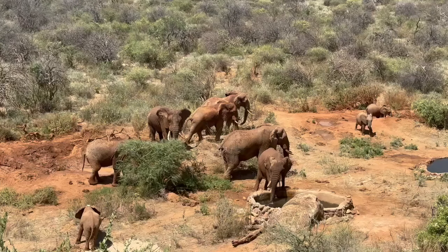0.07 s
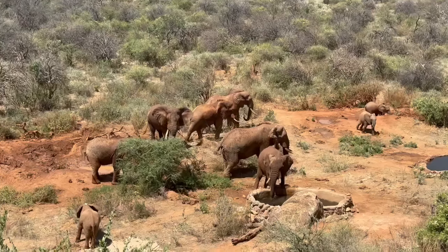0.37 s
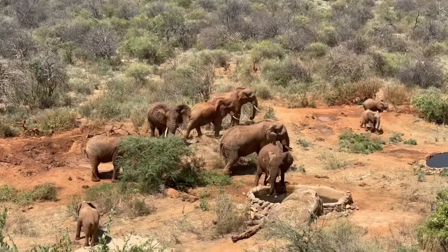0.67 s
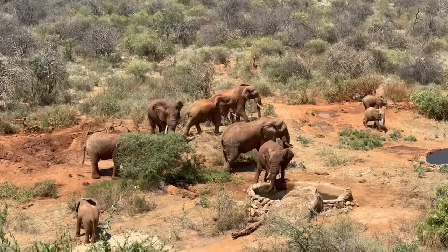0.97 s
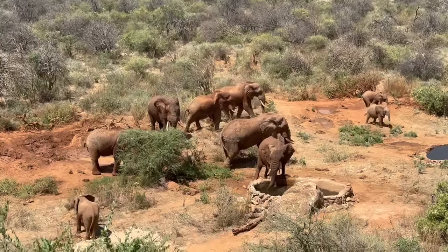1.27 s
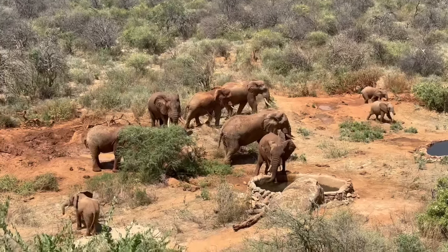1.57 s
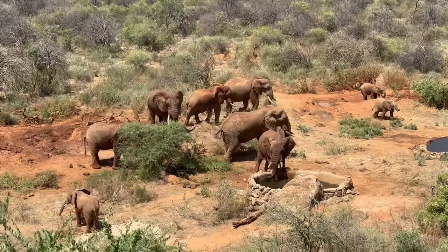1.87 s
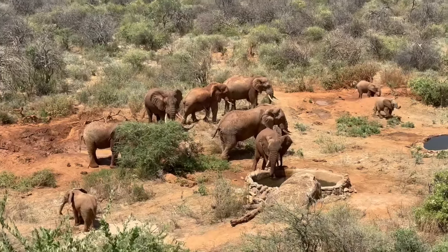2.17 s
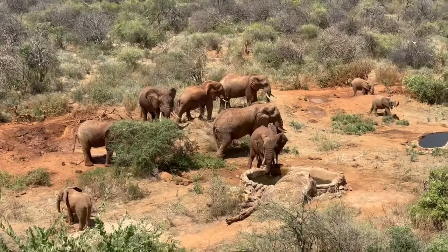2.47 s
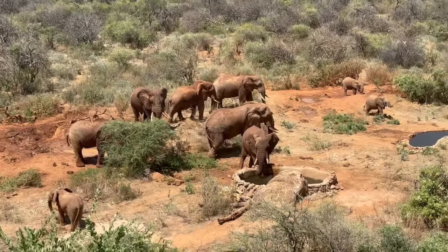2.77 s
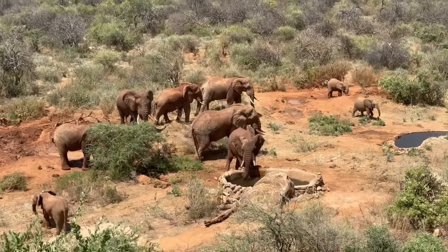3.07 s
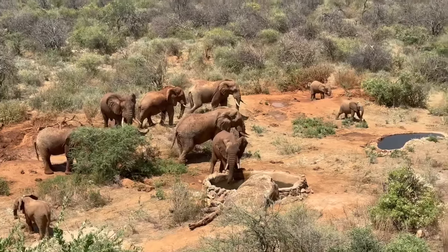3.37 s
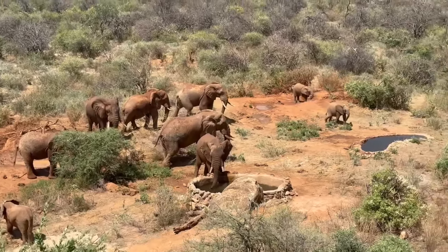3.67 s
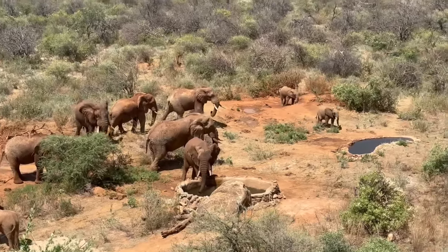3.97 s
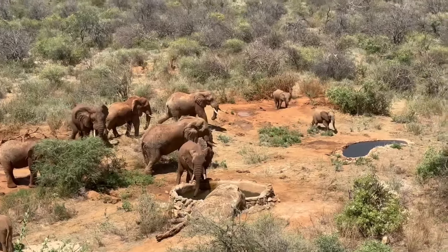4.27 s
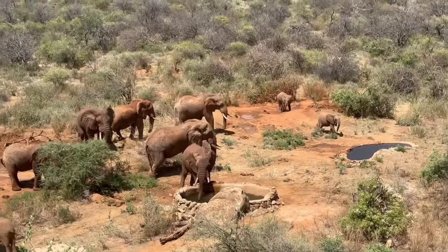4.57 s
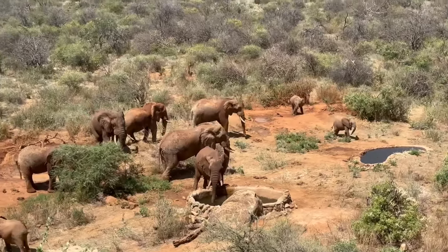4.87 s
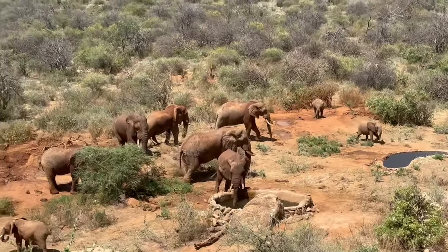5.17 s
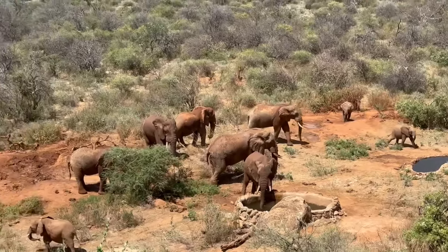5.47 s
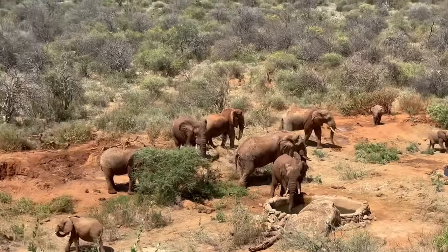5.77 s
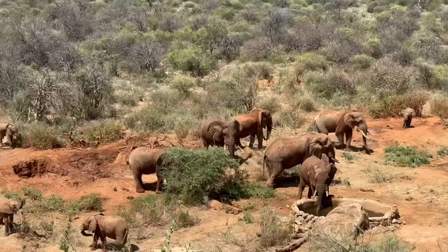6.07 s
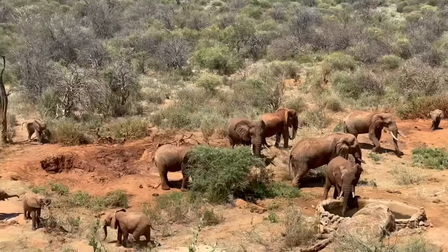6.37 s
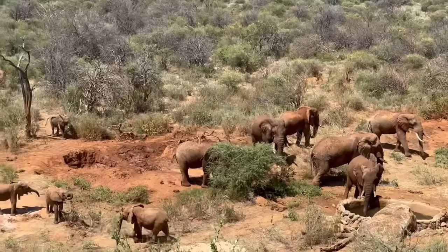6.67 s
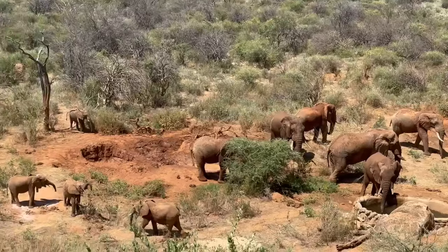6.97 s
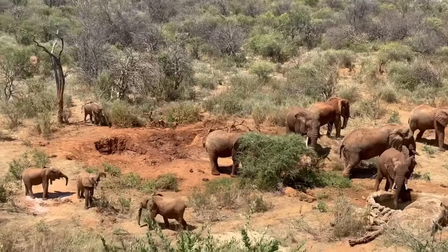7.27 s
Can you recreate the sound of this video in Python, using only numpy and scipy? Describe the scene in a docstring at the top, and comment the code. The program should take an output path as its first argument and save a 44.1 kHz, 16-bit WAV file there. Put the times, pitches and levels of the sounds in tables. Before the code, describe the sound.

The sound starts abruptly with something like a chair being dragged over a sandy deck, close and slightly left. It makes a loud, harsh, ringing roar with grit and short squeals, stalls at about 0.75 seconds and settles with two soft scuffs. From 1 second on, a quiet breeze hisses in dry bushes and rumbles lightly on the microphone, over a very faint, steady high whine. Everything cuts out for an instant just after 2 seconds. Near 3 seconds comes a quick cluster of dull thumps, each dropping in pitch with a short low ring, the last much louder. Tiny dry twig snaps are scattered throughout the breeze, clearest at about 2.3, 3.3 and 4.3 seconds. The breeze swells slightly around 4 seconds, then eases. Faint thumps fall near 5, 5.3, 6.5 and 7 seconds, followed by one small woody snap just before the end.

```python
"""A lookout above a waterhole in dry scrub. Close by, something like a chair is dragged over the deck:
its feet stick and slip on sand, and its frame rings with a harsh roar and short squeals. Then a light
breeze hisses in the bushes and rumbles on the microphone, with a faint high whine, tiny snaps of
dry twigs and a few dull thumps that fall quickly in pitch, each with a short low ring."""
import sys
import numpy as np
from scipy import signal
from scipy.fft import rfft, irfft
from scipy.io import wavfile
from scipy.ndimage import uniform_filter1d, minimum_filter1d

SR = 44100
rng = np.random.default_rng(int(sys.argv[2]) if len(sys.argv) > 2 else 0)


def wav_record(signal):
    """Record a signal, one row per channel, as 16-bit PCM in the file named by sys.argv[1]."""
    frames = np.transpose(np.atleast_2d(signal))
    bounded = np.clip(frames, -1, 1)
    # unit amplitude maps onto the largest positive 16-bit level
    quanta = np.round(bounded * 32767).astype(np.int16)
    wavfile.write(sys.argv[1], SR, quanta)


N = 323253
TIME, FREQ = np.arange(N) / SR, np.fft.rfftfreq(N, 1 / SR)
STOP_S = 0.7504  # the drag stalls
CALM_DB = -63  # reference breeze strength

# stick-slip rate of the slowest foot: time_s, slips_per_s
SLIP_RATE = [(0.05, 72), (0.18, 72.6), (0.25, 91), (0.40, 106), (0.55, 126), (0.66, 120), (0.76, 90.4),
             (0.90, 115)]
# chair frame resonances: pitch_hz, width_hz, gain_db
FRAME_MODES = [(271.9, 16.2, -3.5), (351, 19.5, -0.5), (399.4, 15.4, -2.5), (468, 29, -7.5), (531, 18, -3),
               (563.6, 18, -0.5), (659, 28, 0), (716, 31, 0.5), (766, 64, -3), (867, 14, -3),
               (951, 19.5, -0.5), (997, 15, -0.5), (1058, 26, -3), (1108, 12, -11), (1160, 28, -4.5),
               (1235, 15, -2.5), (1278, 14, 0), (1320, 28, -3.5), (1400, 20, -1), (1450, 78, -15),
               (1557, 79, -11), (1640, 17, -11.5), (1900, 85, -18), (2031, 29, -10), (2114, 23, -17),
               (2374, 240, -18.5), (2600, 60, -20.5), (2770, 31, -16.5), (2830, 210, -26.5)]
# breeze: time_s, strength_db
BREEZE_STRENGTH = [(1.2, -62.5), (2.5, -61), (3.0, -59.5), (3.3, -60.5), (4.1, -58), (4.8, -59), (5.5, -61),
                   (7.3, -64)]
# dry leaf spectrum: freq_hz, gain_db
LEAF_SPECTRUM = [(1500, -28), (3500, -4), (5300, -1.5), (6500, 1.5), (8000, 1), (9500, -1), (11000, -7.5),
                 (13000, -11.5), (15500, -16)]


def gain_of(db):
    """Decibels to amplitude."""
    return 10 ** (np.asarray(db) / 20)


def unit_rms(x):
    """Scales to rms 1."""
    return x / np.sqrt(np.mean(x ** 2) + 1e-20)


def at_hz(table, hz):
    """Interpolates a table over log frequency."""
    freq_hz, value = np.transpose(table)
    return np.interp(np.log(hz + 1), np.log(freq_hz + 1), value)


def at_time(table, t):
    """Interpolates a table over time."""
    return np.interp(t, *np.transpose(table))


def add(mix, start_s, sound):
    """Mixes a sound in at start_s."""
    part = mix[max(round(start_s * SR), 0):][:len(sound)]
    part += sound[:len(part)]


def drift(size, cutoff_hz):
    """Smooth random motion, rms 1."""
    hz = np.fft.rfftfreq(size, 1 / SR)
    return unit_rms(irfft(rfft(rng.standard_normal(size)) / (1 + (hz / cutoff_hz) ** 4), size))


def swell(peak_s, width_s):
    """Gaussian envelope of height 1."""
    return np.exp(-.5 * ((TIME - peak_s) / width_s) ** 2)


def ring(x, response, size=8192):
    """Minimum-phase body with gain response(hz)."""
    log_gain = np.log(response(abs(np.fft.fftfreq(size, 1 / SR))) + 1e-5)
    impulse = np.fft.ifft(np.exp(np.conj(signal.hilbert(log_gain)))).real
    return signal.fftconvolve(x, impulse[:size // 2])[:len(x)]


def steadied(x, size=1500):
    """Holds the running rms near 1."""
    power = uniform_filter1d(uniform_filter1d(x ** 2, size), size)
    return x / np.sqrt(abs(power) + 1e-3 * np.mean(x ** 2))


def phase_split(x, lead_table):
    """Advances left against right by a frequency-dependent phase."""
    return irfft(rfft(x) * np.exp(.5j * at_hz(lead_table, FREQ) * np.array([[1], [-1]])), N)


def stick_slip(t, jitter=.09, spread_db=2.0, sand=0.29, foot_ratio=1.31, feet=3):
    """Each foot sticks and lets go at its own uneven rate; sand crunches in between."""
    rate_hz = at_time(SLIP_RATE, t)
    kicks = np.zeros(len(t))
    for foot in range(feet):
        foot_hz = rate_hz * foot_ratio ** foot * np.exp(jitter * drift(len(t), 70))
        cycles = np.cumsum(foot_hz) / SR + rng.random()
        released = np.diff(np.floor(cycles), prepend=0) > 0
        kicks += released * gain_of(spread_db * rng.standard_normal(len(t)))
    return unit_rms(kicks - kicks.mean()) + sand * rng.standard_normal(len(t))


def stall_db(t, tau_s):
    """Level drop as the feet stall: -10 dB at STOP_S, then down to a floor."""
    return -10 * np.exp(np.minimum((t - STOP_S) / tau_s, 2))


def frame(drive, rolloff):
    """Frame modes, summed in power, ring at a steady level; cut where rolloff(hz) exceeds 1."""
    def response(hz):
        modes = (gain_of(db) / (1 + ((hz - pitch_hz) / width_hz) ** 2)
                 for pitch_hz, width_hz, db in FRAME_MODES)
        return np.sqrt(sum(mode ** 2 for mode in modes)) / np.hypot(1, rolloff(hz))
    return steadied(ring(drive, response))


def singing(t, share_db=-14, sharp_hz=25, swing_db=5, swing_hz=5, waver=0.0047):
    """The sharpest frame modes take turns to sing faintly above the roar."""
    out = np.zeros(len(t))
    for pitch_hz, width_hz, db in FRAME_MODES:
        cycles = np.cumsum(pitch_hz * (1 + waver * drift(len(t), 50))) / SR
        grip = gain_of(db + swing_db * np.minimum(drift(len(t), swing_hz), 1))
        out += grip / np.hypot(1, (width_hz / sharp_hz) ** 2) * np.sin(2 * np.pi * cycles)
    return gain_of(share_db) * unit_rms(out)


def screeches(t, speed, rise=0.05, waver=0.0091, flutter_db=4.5, flutter_hz=14):
    """Sand screeches under a foot, higher as it slips faster."""
    # tones at the slowest slip: pitch_hz, level_db
    tones = [(2000, -41.5), (2390, -42), (2740, -42), (3400, -48), (4680, -48)]
    out = np.zeros(len(t))
    for pitch_hz, db in tones:
        cycles = np.cumsum(pitch_hz * (1 + rise * speed + waver * drift(len(t), 120))) / SR
        level = gain_of(db + flutter_db * np.minimum(drift(len(t), flutter_hz), 1))
        out += level * np.sin(2 * np.pi * cycles)
    return out


def grit(rattle, speed, level_db=-37.8, speed_db=3.5, low_cut_hz=2500):
    """Sand crunches under the feet, louder and duller with speed."""
    # crunch spectra at slow and fast slip: freq_hz, gain_db
    slow_spectrum = [(2500, -6), (2850, 8), (3300, -2), (4000, 2), (4700, 1.5), (5400, 2.5), (6000, -5),
                     (7400, -8), (8400, -10), (9300, -16.5), (11000, -21), (13000, -31), (15500, -38)]
    fast_spectrum = [(2500, -6), (3200, -1), (3700, 1.5), (4400, 0), (4950, -0.5), (5500, -9), (6000, -14),
                     (7400, -12.5), (8400, -17), (9300, -19.5), (11000, -36), (13000, -47), (15500, -63)]

    def crunch(spectrum):
        return steadied(ring(
            rattle, lambda hz: gain_of(at_hz(spectrum, hz)) * np.minimum(hz / low_cut_hz, 1) ** 4))
    blend = (1 - speed) * crunch(slow_spectrum) + speed * crunch(fast_spectrum)
    return steadied(blend) * gain_of(level_db + speed_db * speed)


def scuffs(t, kicks, rise_db_per_s=1000, fall_db_per_s=420, cutoff_hz=700):
    """The feet settle with soft scuffs on the low frame modes."""
    # scuffs: peak_s, level_db
    peaks = [(0.76, -29.5), (0.837, -30)]
    level = sum(gain_of(db - np.maximum((peak_s - t) * rise_db_per_s, (t - peak_s) * fall_db_per_s))
                for peak_s, db in peaks)
    return level * frame(kicks, lambda hz: (hz / cutoff_hz) ** 8)


def chair(start_s=0.054, roar_db=-18, rasp_db=-31.5, split_hz=1750, sand_s=0.0023,
          bite_db=-3.5, bite_s=0.056, ease_db_per_s=-4, treble_stall=2.1):
    """Slips shake the frame: low modes roar, high modes rasp. The drag bites, eases and stalls."""
    t = TIME[:SR]
    speed = np.interp(at_time(SLIP_RATE, t), [75, 115], [0, 1])
    kicks = stick_slip(t)
    # each slip grinds sand for a moment
    grinding = np.sqrt(signal.lfilter([1], [1, -np.exp(-1 / (sand_s * SR))], kicks ** 2))
    rattle = 0.37 * kicks + unit_rms(grinding) * rng.standard_normal(len(t))
    age_s = np.maximum(t - start_s, 0)
    force_db = roar_db + bite_db * np.exp(-age_s / bite_s) + ease_db_per_s * age_s
    drop_db = stall_db(t, tau_s=0.023)
    roar = frame(kicks, lambda hz: (hz / split_hz) ** 12) + singing(t)
    rasp = gain_of(rasp_db) * frame(rattle, lambda hz: (split_hz / (hz + 1)) ** 12)
    drag = roar * gain_of(force_db + drop_db)
    drag += (rasp + screeches(t, speed)) * gain_of(treble_stall * drop_db)
    drag += grit(rattle, speed) * gain_of(treble_stall * stall_db(t, tau_s=0.032))
    return np.pad(drag + scuffs(t, kicks), (0, N - len(t)))


def squeals(trim_db=-5.5, waver=0.0058, flutter_db=0.5, sag_per_s=1.4):
    """A foot locks on to one resonance and sings; the pitch sags once the chair stops."""
    # squeals: start_s, length_s, pitch_hz, relative_db
    notes = [(0.072, 0.23, 355.5, -23.5), (0.096, 0.055, 691, -22), (0.239, 0.267, 1264, -21.5),
             (0.339, 0.154, 1407, -22.5), (0.49, 0.089, 663, -24), (0.618, 0.099, 380.4, -26.5),
             (0.645, 0.1, 948, -22), (0.746, 0.06, 346, -21)]
    out = np.zeros(N)
    for start_s, length_s, pitch_hz, db in notes:
        n = round(length_s * SR)
        sag = sag_per_s * np.maximum(start_s + TIME[:n] - STOP_S, 0)
        hz = pitch_hz * (1 - sag + sag.mean() + waver * drift(n, 50))
        level = gain_of(db + trim_db + flutter_db * drift(n, 40)) * signal.windows.tukey(n, 0.56)
        add(out, start_s, np.sqrt(2) * level * np.sin(2 * np.pi * np.cumsum(hz) / SR))
    return out


def reflections(x, t60_s):
    """Dense, short echo tail of unit energy."""
    t = TIME[:SR // 3]
    echoes = rng.standard_normal(len(t)) * gain_of(-60 * t / t60_s)
    return signal.fftconvolve(x, echoes / np.linalg.norm(echoes))[:len(x)]


def deck(x, low_cut_hz=205, tail_hz=1800, tail_db=-15, side_db=-21):
    """The frame radiates no deep bass and sits slightly left; treble lingers, board echoes widen it."""
    # stereo lean: freq_hz, left_minus_right_db
    lean = [(100, 1), (380, .7), (700, 1.8), (1300, 1.8), (2400, 0)]
    x = signal.sosfilt(signal.butter(6, low_cut_hz, "high", fs=SR, output="sos"), x)
    treble = signal.sosfilt(signal.butter(2, tail_hz, "high", fs=SR, output="sos"), x)
    x = x + gain_of(tail_db) * reflections(treble, t60_s=0.7)
    side = gain_of(side_db) * reflections(x, t60_s=0.067)
    sign = np.array([[1], [-1]])
    return irfft(rfft(x) * gain_of(sign * at_hz(lean, FREQ) / 2), N) + sign * side


def wash(spectrum, patchy_db, flicker_db, side_db, size=512):
    """Coloured stereo noise with drifting patches and a flicker common to all bands."""
    hop = size // 4
    steps, bins = N // hop + 5, size // 2 + 1
    patches = uniform_filter1d(rng.standard_normal((steps, bins)), size=9, axis=0)
    patches = unit_rms(uniform_filter1d(patches, size=7, axis=1))
    flicker = unit_rms(uniform_filter1d(rng.standard_normal(steps), size=4))
    cells = rng.standard_normal((2, bins, steps)) + 1j * rng.standard_normal((2, bins, steps))
    cells *= gain_of(patchy_db * patches.T + flicker_db * flicker)
    white = signal.istft(cells, nperseg=size, noverlap=size - hop)[1][:, :N]
    mid, side = irfft(rfft(white) * gain_of(at_hz(spectrum, FREQ)), N)
    return unit_rms(mid) + gain_of(side_db) * unit_rms(side) * np.array([[1], [-1]])


def eddies(share_db=-9.5, rate_per_s=30, spread_db=4.5, t60_s=0.039, band_hz=(320, 590)):
    """Small eddies pat the microphone at random."""
    starts = (rng.random(N) < rate_per_s / SR) * gain_of(spread_db * np.minimum(rng.exponential(1, N), 2))
    pats = signal.fftconvolve(starts, gain_of(-60 * TIME[:SR // 10] / t60_s))[:N]
    band = signal.butter(2, band_hz, "band", fs=SR, output="sos")
    return gain_of(share_db) * unit_rms(signal.sosfilt(band, pats * rng.standard_normal(N)))


def air(level_db=-50.5, follow=0.31):
    """Air in the scrub follows the breeze and reaches the right microphone port first."""
    # air spectrum: freq_hz, gain_db
    spectrum = [(20, -32), (45, -15), (90, -2.5), (200, -0.5), (500, -0.5), (850, -0.5), (1100, -3),
                (1400, -3.5), (2000, -9.5), (3150, -11.5), (3500, -15.5), (6000, -26), (15000, -39)]
    # arrival phase: freq_hz, left_lead_rad
    arrival = [(50, 0.18), (250, -0.63), (500, -1.09), (1100, -1.75), (1500, -1), (2100, -0.033)]
    flow = wash(spectrum, patchy_db=2, flicker_db=0.78, side_db=-14.5) + eddies()
    level = gain_of(level_db + follow * (at_time(BREEZE_STRENGTH, TIME) - CALM_DB))
    return phase_split(flow * level, arrival)


def leaves(above_breeze_db=1.5, rustle_s=0.036):
    """Dry leaves hiss with the breeze; a nearby bush rustles."""
    # rustles: peak_s, level_db
    rustles = [(2.13, -61), (4.04, -59), (5.0, -57)]
    rustle = sum(gain_of(db) * swell(peak_s, rustle_s) for peak_s, db in rustles)
    hiss = gain_of(at_time(BREEZE_STRENGTH, TIME) + above_breeze_db)
    return wash(LEAF_SPECTRUM, patchy_db=1.5, flicker_db=1.5, side_db=-48) * np.hypot(hiss, rustle)


def wind_rumble(lull_db=-67.5, lumps_db=1.0, lumps_hz=7):
    """Gusts strike the microphone over a faint, uneven rumble."""
    # gusts: peak_s, width_s, level_db
    gusts = [(0.08, 0.033, -48), (0.26, 0.26, -53.5), (0.65, 0.018, -46), (0.85, 0.029, -51.5),
             (1.11, 0.025, -56), (1.6, 0.09, -60), (2.88, 0.18, -58.5), (3.01, 0.029, -50)]
    # rumble spectrum: freq_hz, gain_db
    spectrum = [(15, -32), (35, -4), (55, 2), (90, -3), (150, -14), (400, -42), (3000, -75)]
    gusting = sum(gain_of(db) * swell(peak_s, width_s) for peak_s, width_s, db in gusts)
    lull = gain_of(lull_db + lumps_db * drift(N, lumps_hz))
    return wash(spectrum, patchy_db=2, flicker_db=2.5, side_db=-14) * np.hypot(lull, gusting)


def whine(top_hz=3138.5, step_hz=91.8, top_db=-72, step_db=-1.4):
    """Four faint, steady tones, each weaker than the one above."""
    return sum(np.sqrt(2) * gain_of(top_db + k * step_db)
               * np.sin(2 * np.pi * ((top_hz - k * step_hz) * TIME + rng.random())) for k in range(4))


def twig_ticks(calm_per_s=1.6, follow=1.8, faint_db=-48, spread_db=1.5, decay_s=0.0028):
    """Dry twigs snap: a few at set times, fainter ones at random, more often as the breeze rises."""
    # loudest snaps: start_s, level_db
    loudest = [(2.3219, -45), (3.2483, -42.5), (3.3366, -47), (3.4161, -43), (4.2899, -43.5)]
    rate_per_s = calm_per_s * gain_of(follow * (at_time(BREEZE_STRENGTH, TIME) - CALM_DB))
    starts = (rng.random(N) < rate_per_s / SR) * gain_of(faint_db + spread_db * rng.standard_normal(N))
    for start_s, db in loudest:
        add(starts, start_s, gain_of([db]))
    envelope = signal.fftconvolve(starts, np.exp(-TIME[:SR // 50] / decay_s))[:N]
    return ring(envelope * rng.standard_normal(N), lambda hz: gain_of(at_hz(LEAF_SPECTRUM, hz)))


def thumps(rest_hz=330, sweep_hz=700, sag_s=0.0024, thump_s=0.0027,
           ring_hz=240, ring_s=0.0072, ring_db=-7):
    """Dull thumps that fall quickly in pitch, each with a short low ring."""
    # thumps: start_s, level_db, pitch_ratio
    events = [(2.123, -46, 0.88), (2.864, -37, 0.54), (2.905, -35.5, 0.78), (2.991, -35, 0.67),
              (2.997, -32, 0.35), (3.0349, -15.5, 0.97), (4.955, -41, 0.82), (5.255, -43, 1.07),
              (6.532, -43, 1.5), (7.01, -40, 0.75)]
    out, t = np.zeros(N), TIME[:SR // 16]
    thump_env, ring_env = ((t / peak_s * np.exp(1 - t / peak_s)) ** 4 for peak_s in (thump_s, ring_s))
    for start_s, db, pitch_ratio in events:
        hz = pitch_ratio * (rest_hz + sweep_hz * np.exp(-(t / sag_s) ** 1.16))
        thump = thump_env * np.sin(2 * np.pi * np.cumsum(hz) / SR)
        low_ring = gain_of(ring_db) * ring_env * np.sin(2 * np.pi * pitch_ratio * ring_hz * t)
        add(out, start_s, -gain_of(db) * (thump + low_ring))
    return out


def twig_snap(start_s=7.075, level_db=-42, pitch_hz=2100, t60_s=0.026):
    """One thicker twig snaps with a short woody ring."""
    out, t = np.zeros(N), TIME[:SR // 20]
    add(out, start_s, gain_of(level_db - 60 * t / t60_s) * np.sin(2 * np.pi * pitch_hz * t))
    return out


def limiter(x, ceiling=0.35, size=90):
    """Fast gain reduction on the highest peaks."""
    gain = np.minimum(1, ceiling / (abs(x).max(0) + 1e-9))
    return x * uniform_filter1d(minimum_filter1d(gain, size), size)


def scene():
    """The drag on the deck over breeze, whine, twigs and dull thumps."""
    drag = deck(chair() + squeals())
    breeze = air() + leaves() + wind_rumble()
    return drag + breeze + whine() + twig_ticks() + thumps() + twig_snap()


def record(dry, cutoff_hz=15750):
    """Left-right phase shift, limiter and low-pass; the sound starts abruptly and cuts out once."""
    # left-right phase by frequency, centred from 5.3 to 6.4 kHz: freq_hz, left_lead_rad
    stereo_phase = [(2100, 0), (2900, .5), (3500, .6), (4700, .42), (5300, 0), (6400, 0), (6900, .4),
                    (7400, 1.35), (7950, 3.1), (8600, 3.15), (8950, 2.4), (9200, 1.5), (9600, 1.15),
                    (10500, .6), (11200, 0), (13000, 0), (14500, -1.3), (16000, -2.7)]
    # silences: start_s, end_s
    silences = [(-1, 0.057), (2.079, 2.1015)]
    muted = sum((TIME > start_s) & (TIME < end_s) for start_s, end_s in silences)
    gate = 1 - .9995 * uniform_filter1d(muted * 1., size=40)
    heard = limiter(phase_split(dry, stereo_phase)) * gate
    low_pass = signal.firwin(511, cutoff_hz, window=("kaiser", 9), fs=SR)
    return signal.oaconvolve(heard, low_pass[None], "same")


dry = scene()
out = record(dry)
wav_record(out)
```